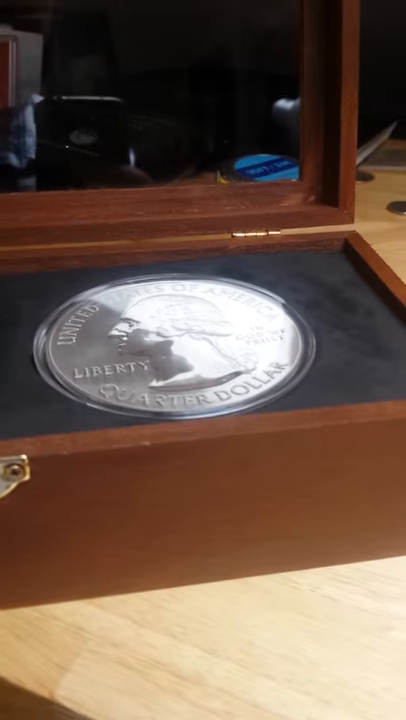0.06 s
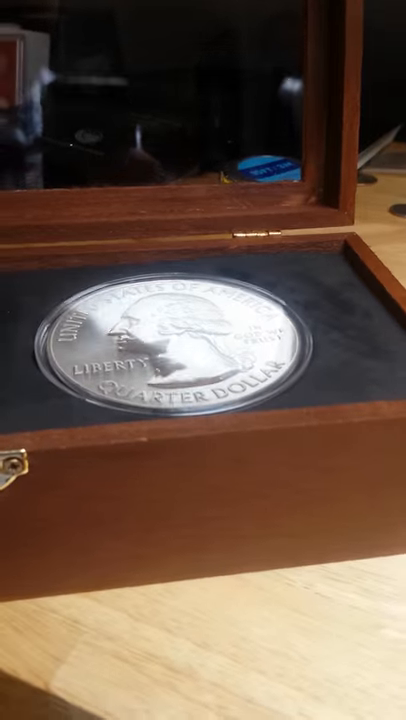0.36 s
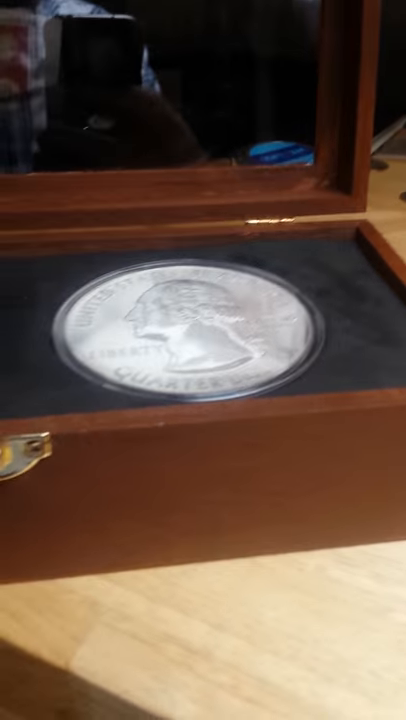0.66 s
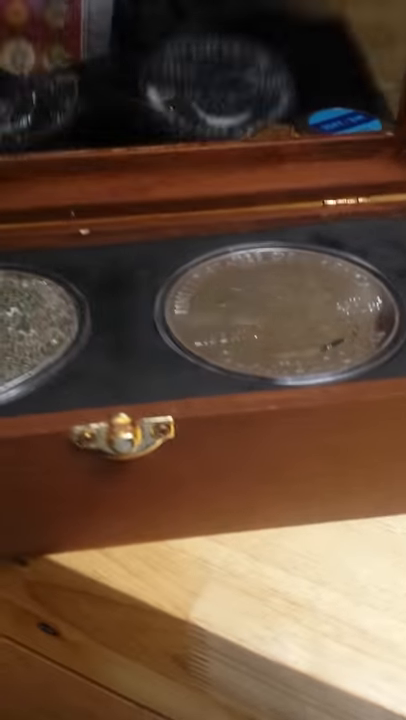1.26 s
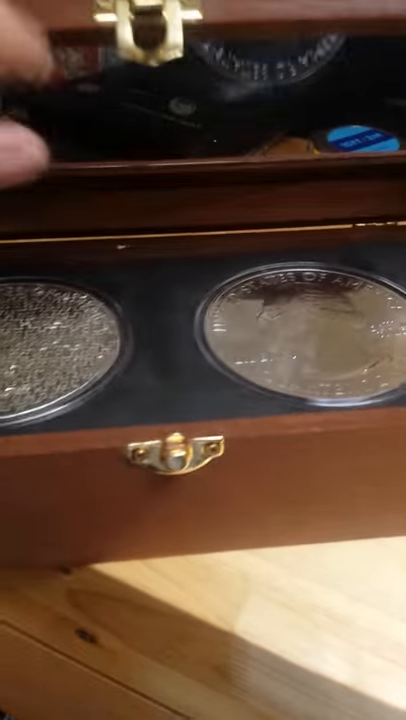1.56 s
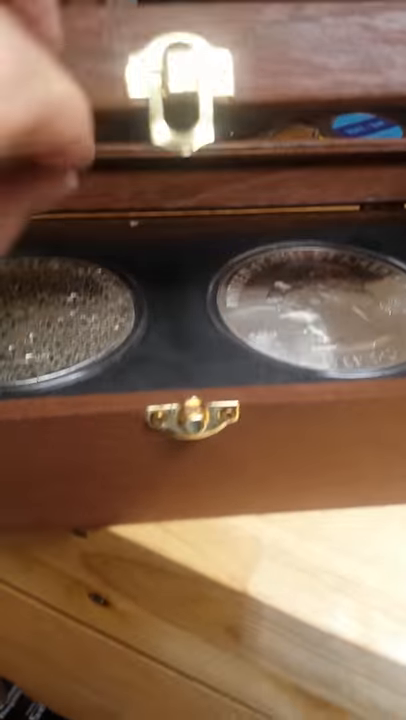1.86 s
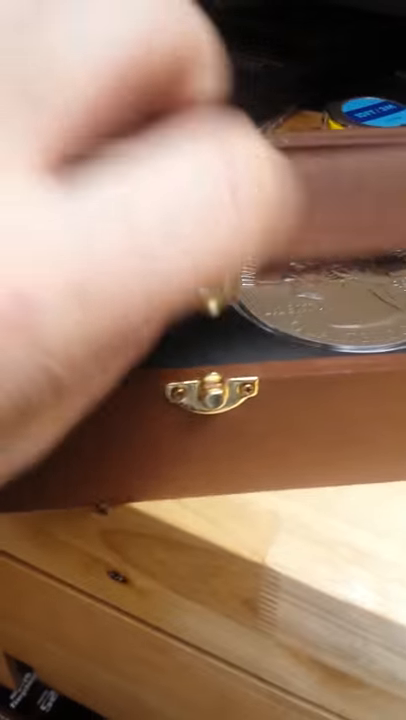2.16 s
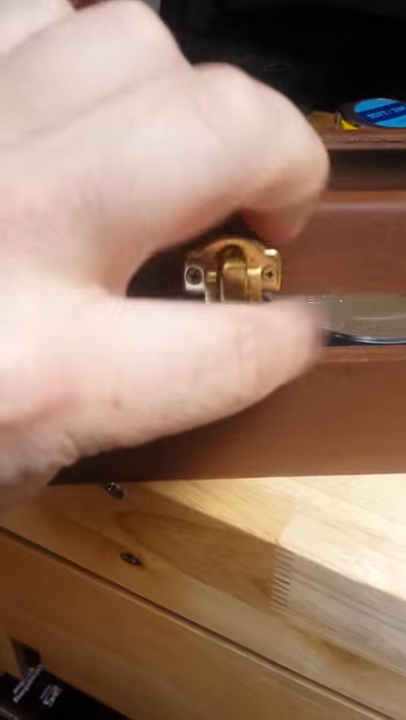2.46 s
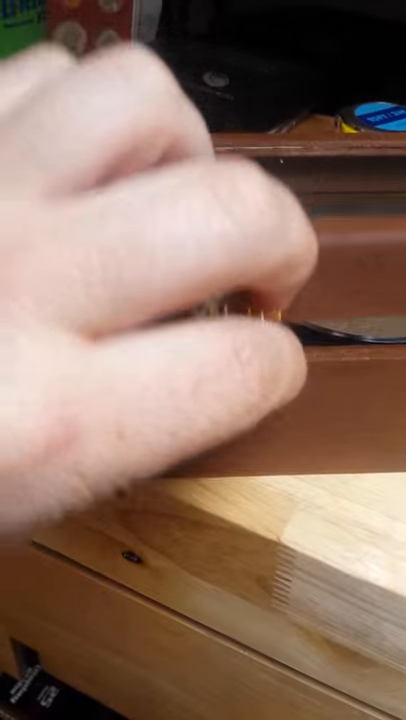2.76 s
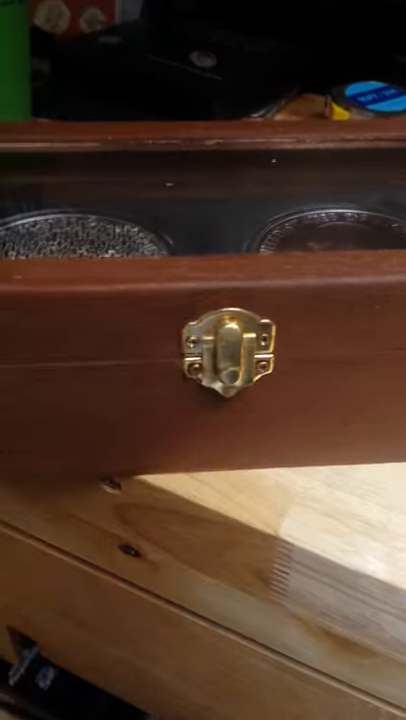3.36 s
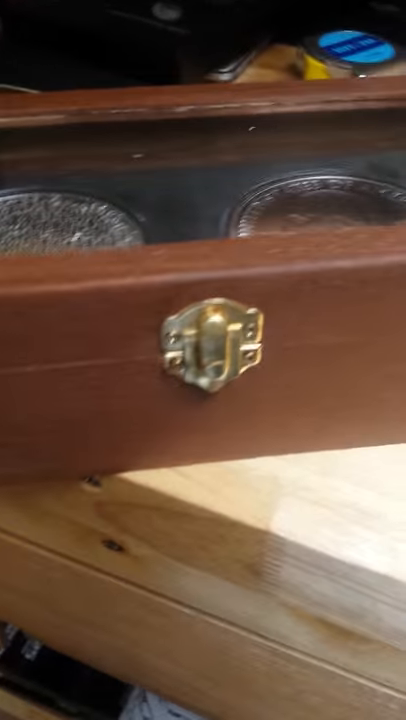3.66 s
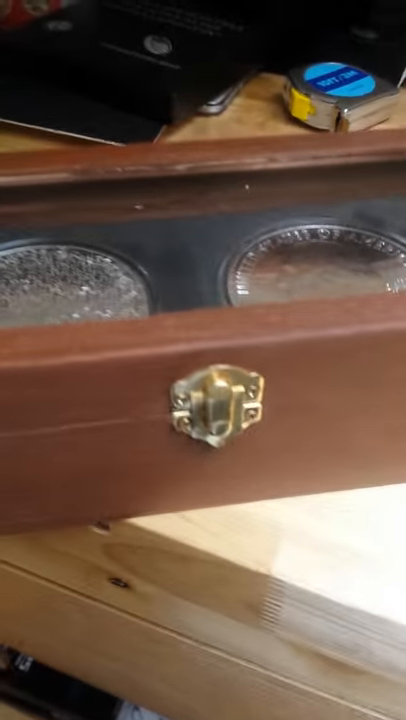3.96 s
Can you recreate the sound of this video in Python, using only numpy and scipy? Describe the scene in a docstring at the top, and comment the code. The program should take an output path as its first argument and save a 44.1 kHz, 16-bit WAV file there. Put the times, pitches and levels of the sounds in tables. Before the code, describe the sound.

A metal latch snaps shut sharply on a wooden box just after its lid thuds closed.

```python
"""A brass latch snaps shut on a wooden display box: metal cracks on metal, the brass rings, the case knocks.
Just before the snap, a hand lowers the lid and seats it with a soft thud; fingers rub the wood.
Behind them a machine hums and its panel rattles faintly in the small room.
The snap overloads the close microphones, and gain control turns the room down after it."""
import sys
import numpy as np
from scipy import signal
from scipy.fft import rfft, irfft
from scipy.io import wavfile
from scipy.ndimage import uniform_filter1d

SR = 44100
rng = np.random.default_rng(int(sys.argv[2]) if len(sys.argv) > 2 else 0)


def put_to_file(sound):
    """Save the sound as 16-bit audio at rate SR, in the file named by the first command-line argument."""
    columns = np.atleast_2d(sound).T  # one column per channel
    safe = np.clip(columns, -1, 1)
    whole_steps = np.round(safe * 32767)
    wavfile.write(sys.argv[1], SR, whole_steps.astype(np.int16))


N = 176400
T = np.arange(N) / SR
RING_T = T[:SR // 8]

# latch clicks, knock and hasp relative to their click: start_s, level_db, knock_db, hasp_db
LATCH_CLICKS = [(2.1687, -28.5, -18, -11), (2.245, -31.5, -2, -10), (2.5285, -35, -1, -13),
                (2.928, -33, 10.5, 6), (2.96, -33, -8, -1), (3.002, -31.5, -13.5, -6),
                (3.1052, -28.5, 5, -11), (3.109, -11.5, -5, -11), (3.112, -16.5, -2, -10),
                (3.1154, 0.3, 1, -12), (3.285, -42, 10, -10)]
# bite of metal on metal: freq_hz, level_db
CRACK_COLOUR = [(100, -20), (450, -19), (900, -3), (1600, -5), (2050, -9), (2650, 1), (3200, -8),
                (4200, -3.5), (5600, -2), (7000, 1.5), (8200, -6), (10300, -3), (12500, -9.5), (16000, -15)]
# bright ring of the brass: pitch_hz, level_db, t60_s, left_minus_right_db
BRASS_MODES = [(4157, -22.5, 0.038, 3), (4480, -34, .025, 2), (5320, -15, 0.024, -10),
               (6140, -21.5, 0.031, 6), (6660, -20, .018, 0), (7000, -14.5, .025, 0), (7440, -28, .03, 0),
               (8470, -24, 0.027, -6), (9300, -22, 0.021, -2), (9990, -21, 0.023, -4),
               (10530, -24, 0.02, -4)]
# knock of the wooden case: pitch_hz, level_db, t60_s
KNOCK_MODES = [(701, -29.5, .013), (818, -15, 0.027), (1066, -12.5, .015), (1232, -12.5, .015),
               (1514, -12, .019), (1740, -26, 0.011), (2570, -20, .011), (2620, -18.5, .011)]
# ping of the loose hasp: pitch_hz, level_db, t60_s
HASP_MODES = [(4840, -14, .035)]
CRACK_DB, CRACK_DECAY_S, CHATTER_DB, CHATTER_DECAY_S = -10, 0.0014, -18.5, 0.0074
LEFT_LAG_S, KNOCK_LEFT_LAG_RAD = 0.00003, 0.98  # the left microphone hears the latch later
def latch():
    """Each click is a short crack and chatter that rings the brass and knocks the wood."""
    out = np.zeros((2, N))
    burst = amp(CRACK_DB) * np.exp(-RING_T / CRACK_DECAY_S)
    burst += amp(CHATTER_DB) * np.exp(-RING_T / CHATTER_DECAY_S)
    knock = np.array([ring(KNOCK_MODES, np.pi / 2 - lag) for lag in (KNOCK_LEFT_LAG_RAD, 0)])
    hasp = ring(HASP_MODES)
    for start_s, db, knock_db, hasp_db in LATCH_CLICKS:
        crack = noise(CRACK_COLOUR, size=len(RING_T)) * burst
        brass = np.zeros_like(crack)
        for *mode, side_db in BRASS_MODES:
            pan = amp([[side_db / 2], [-side_db / 2]])
            brass += pan * np.array([ring([mode], phase) for phase in rng.uniform(0, 2 * np.pi, 2)])
        left, right = amp(db) * (crack + brass + amp(knock_db) * knock + amp(hasp_db) * hasp)
        add(out[0], start_s + LEFT_LAG_S, left)
        add(out[1], start_s, right)
    return latch_radiation(out)


def latch_spill(spill_db=16.5):
    """What the latch sends to the walls: over all directions its ring evens out into a plain click."""
    out = np.zeros((2, N))
    for start_s, db, *_ in LATCH_CLICKS:
        add(out, start_s, amp([db + spill_db]))
    return latch_radiation(out)


def latch_radiation(x, low_cut_hz=760):
    """A part as small as the latch radiates no bass."""
    return signal.sosfilt(signal.butter(3, low_cut_hz, "high", fs=SR, output="sos"), x)


# soft blows of wood on wood: start_s, level_db, contact_s
LID_THUDS = [(2.9358, 0.5, 0.001), (2.9516, -8, 0.0016)]
# hollow body of the shut box: pitch_hz, level_db, t60_s
BOX_MODES = [(128, -27, 0.045), (212, -19, 0.03), (325, -22.5, 0.022), (726, -17, .015),
             (890, -15.5, 0.017), (1230, -21, .016), (1560, -23, .012)]
def lid(low_cut_hz=50):
    """The lid lands with a cushioned blow and settles once more; the small box radiates little bass."""
    out = np.zeros((2, N))
    body = ring(BOX_MODES, np.pi / 2)
    for start_s, db, contact_s in LID_THUDS:
        push = np.sin(np.pi * np.minimum(T[:SR // 100] / contact_s, 1))  # longer contact, duller thud
        add(out, start_s, amp(db) * np.convolve(body, push / push.sum()))
    return signal.sosfilt(signal.butter(2, low_cut_hz, "high", fs=SR, output="sos"), out)


# fingers sliding on the lid: start_s, length_s, level_db, swell_db, squeak_db
FINGER_RUBS = [(1.44, 0.058, -52.5, 0, -9), (1.982, 0.064, -44.5, -1, -4.5), (2.04, 0.135, -49.5, -4, -7.5),
               (2.163, 0.095, -55, 8, -9.5), (2.326, 0.15, -47.5, -5.5, -15),
               (2.479, 0.067, -53.5, 8.5, -26), (2.638, 0.061, -56.5, 0, -20), (2.773, 0.22, -63, 3, -16),
               (2.95, 0.034, -45.5, 0, -10), (3.02, .09, -53, 1, -14), (3.697, 0.033, -55.5, -1.5, 0),
               (3.742, .04, -58, 5, -7), (3.933, 0.08, -58.5, 5, -11.5)]
# bright hiss of skin on wood: freq_hz, level_db
SKIN_COLOUR = [(300, 1), (1500, -1), (2900, 4), (3500, 3), (4200, 3), (4800, -1), (6500, -0.5),
               (8000, -1.5), (9800, -2), (11500, -9), (15500, -10)]
# thin squeak on top: freq_hz, level_db
SQUEAK_COLOUR = [(6000, -40.5), (7900, -10.5), (8500, -1), (9300, -9.5), (11000, -24), (12500, -19),
                 (15000, -33)]
# the panel's loudest rattles early on, then the lid scuffing the case: centre_s, half_width_s, level_db
DULL_RASPS = [(0.125, 0.018, -49.5), (0.75, .02, -51), (0.812, 0.0051, -50), (1.10, 0.011, -47.5),
              (2.53, .014, -43.5), (2.695, 0.037, -40.5), (2.695, 0.0046, -38.5), (2.709, 0.0025, -38),
              (2.761, .004, -41), (3.261, 0.002, -32)]
# tone of those rasps: freq_hz, level_db
RASP_COLOUR = [(100, -34), (500, -9), (860, 7), (1250, -1.5), (1650, -4), (2100, -14), (2500, -5.5),
               (3100, -20), (3700, -13), (4500, -22.5), (8000, -25), (14000, -51)]
# the hand withdrawing: centre_s, half_width_s, level_db
HAND_SWISH = (4.02, .17, -52.5)
# breathy tone of that swish: freq_hz, level_db
HAND_SWISH_COLOUR = [(1000, -29), (3000, -14), (4000, 3), (4800, 4), (6000, -8), (9000, -21), (14000, -25)]
def rubs_and_rasps(edge_s=0.022, grain_db=2.5, grain_s=0.0023):
    """Grainy noise: bright finger strokes with a thin squeak, dull rasps and the hand's last swish."""
    out = np.zeros((2, N))
    skin, squeak = noise(SKIN_COLOUR), noise(SQUEAK_COLOUR)
    for start_s, length_s, db, swell_db, squeak_db in FINGER_RUBS:
        fade_in = np.clip((T - start_s) / edge_s, 0, 1)
        fade_out = np.clip((start_s + length_s - T) / edge_s + 0.5, 0, 1)
        progress = np.clip((T - start_s) / length_s, 0, 1)
        out += fade_in * fade_out * amp(db + swell_db * progress) * (skin + amp(squeak_db) * squeak)
    for colour, strokes in ((RASP_COLOUR, DULL_RASPS), (HAND_SWISH_COLOUR, [HAND_SWISH])):
        swells = sum(amp(db) * np.exp(-((T - centre) / width) ** 2 / 2) for centre, width, db in strokes)
        out += noise(colour) * swells
    return out * unit(amp(grain_db * drift(grain_s)))


# tinny ring of the machine's panel: pitch_hz, level_db, t60_s
PANEL_MODES = [(675, -10.5, 0.055), (1160, 6, 0.035), (1240, 6, 0.055), (1250, -28, 0.0159)]
# its hardest taps: start_s, accent_db
PANEL_ACCENTS = [(0.11, 4.5), (0.6589, 12.5), (0.7257, 6), (0.7422, 7), (1.0931, 7)]
# fader ride on the rattle: time_s, level_db
RATTLE_RIDE = [(0, -6.5), (.11, 2.5), (.25, -2), (.5, 1), (.58, -19), (.74, 0), (.95, -9.5), (1.1, 1.5),
               (1.35, 0), (1.48, 2.5), (1.8, -2.5), (2, 1), (2.8, 0), (4, 0.5)]
def panel_rattle(level_db=-50, taps_per_s=60, jitter_s=0.0019, spread_db=3.2, right_lag_s=0.0001):
    """A panel rattles unevenly with the motor's turns."""
    taps = np.zeros(N)
    for turn, (slip, force) in enumerate(rng.standard_normal((260, 2))):
        add(taps, turn / taps_per_s + jitter_s * slip, amp([spread_db * min(force, 2)]))
    for start_s, accent_db in PANEL_ACCENTS:
        add(taps, start_s, amp([accent_db]))
    left = signal.oaconvolve(taps, ring(PANEL_MODES))[:N]
    right = np.interp(T - right_lag_s, T, left)
    ride_db = np.interp(T, *np.transpose(RATTLE_RIDE))
    return amp(level_db + ride_db) * unit(np.array([left, right]))


# low machine hum: pitch_hz, level_db
HUM_TONES = [(96.9, -58), (118.4, -57), (161.5, -58), (242.2, -58), (285.3, -53.5), (376.8, -56.5),
             (629.8, -55)]
# thin electrical whine: pitch_hz, level_db
WHINE_TONES = [(8890, -77.5), (9730, -75), (10620, -80)]
def machine_hum(hum_trim_db=-2):
    """The machine hums and whines, each tone wavering on its own."""
    return amp(hum_trim_db) * tones(HUM_TONES, wander_hz=3.5) + tones(WHINE_TONES, wander_hz=13)


# dark bed of room noise: freq_hz, level_db
AIR_COLOUR = [(25, -30), (42, -26.5), (58, -12), (90, 1), (135, -4), (185, -3), (220, -10.5), (300, -6),
              (400, -4.5), (490, -9.5), (630, -3), (760, -10), (1050, -9), (1300, -12), (1450, -17.5),
              (2200, -19.5), (2700, -23), (4200, -25), (6000, -26), (7500, -32), (9500, -34), (12000, -39),
              (15500, -45.5)]
# how alike it is in left and right: freq_hz, likeness_ratio
AIR_LIKENESS = [(30, 0.87), (130, 1), (290, 0.83), (640, 0.56), (1400, 0.32), (3100, 0.026), (15000, .02)]
def machine_air(level_db=-43, waver_db=0.9):
    """Rushing air with a slight flutter, centred in the bass and wide in the treble."""
    return noise(AIR_COLOUR, AIR_LIKENESS) * amp(level_db + waver_db * drift(seconds=0.027))


# tone of the reverb: freq_hz, level_db
ROOM_COLOUR = [(100, -11.5), (500, -3), (900, 2.5), (1500, 0), (2100, -0.5), (3000, -1), (4000, -0.5),
               (5300, 3), (7000, 1.5), (8700, -0.5), (10000, -7.5), (12000, -12), (16000, -19)]
# length of its tail: freq_hz, t60_s
ROOM_DECAY = [(100, 0.43), (1000, 0.33), (5000, 0.28), (9000, 0.24), (15000, 0.23)]
def room(x, wet_db=-11.5, predelay_s=0.012, rise_s=0.0096):
    """The walls answer after a short gap with a bright, quickly dying tail."""
    hz, t, spectrum = signal.stft(rng.standard_normal((2, SR // 2)), SR, nperseg=256)
    tail_db = read(ROOM_COLOUR, hz)[:, None] - 60 * t / read(ROOM_DECAY, hz)[:, None]
    tail = signal.istft(spectrum * amp(tail_db), SR, nperseg=256)[1]
    tail *= np.clip((T[:tail.shape[1]] - predelay_s) / rise_s, 0, 1)
    return amp(wet_db) * signal.oaconvolve(x, tail / np.linalg.norm(tail[0]), axes=1)[:, :N]


# how alike the two microphones hear close sounds: freq_hz, likeness_ratio
CLOSE_LIKENESS = [(100, 0.66), (1000, 0.94), (3000, 0.17), (6000, 0.17), (15000, 0.26)]
def noise(colour, likeness=CLOSE_LIKENESS, size=N):
    """Coloured stereo noise at rms 1; likeness narrows its image band by band."""
    hz = np.fft.rfftfreq(size, 1 / SR)
    left, independent = rfft(rng.standard_normal((2, size)))
    shared = np.clip(read(likeness, hz), 0, 1)
    right = shared * left + np.sqrt(1 - shared ** 2) * independent
    return unit(irfft(np.array([left, right]) * amp(read(colour, hz)), size))


def ring(modes, phase=0):
    """Dying modes of a struck object."""
    return sum(amp(db - 60 * RING_T / t60) * np.sin(2 * np.pi * hz * RING_T + phase)
               for hz, db, t60 in modes)


def tones(lines, wander_hz):
    """Steady tones whose pitch wanders a little."""
    out = np.zeros(N)
    for hz, db in lines:
        pitch_hz = hz + wander_hz * drift(seconds=0.03)
        out += amp(db) * np.sqrt(2) * np.sin(2 * np.pi * np.cumsum(pitch_hz) / SR)
    return out


def drift(seconds):
    """Smooth random motion that changes over the given time."""
    hz = np.fft.rfftfreq(N, 1 / SR)
    return unit(irfft(rfft(rng.standard_normal(N)) * np.exp(-(2 * hz * seconds) ** 2), N))


def amp(db):
    """Decibels to gain."""
    return 10 ** (np.asarray(db) / 20)


def unit(x):
    """Scales to rms 1."""
    return x / np.sqrt(np.mean(x ** 2) + 1e-20)


def read(points, hz):
    """Reads a curve on a log-frequency axis."""
    freq_hz, value = np.transpose(points)
    return np.interp(np.log(hz + 1), np.log(freq_hz), value)


def add(mix, start_s, sound):
    """Drops a sound into the mix."""
    part = mix[..., max(round(start_s * SR), 0):][..., :sound.shape[-1]]
    part += sound[..., :part.shape[-1]]


def scene():
    """The box and the hand close by, in the humming room."""
    soft_sounds = lid() + rubs_and_rasps()
    foreground = latch() + soft_sounds + room(soft_sounds + latch_spill())
    return foreground + machine_air() + machine_hum() + panel_rattle()


def gain_control(dry, threshold_db=-23.5, slope=0.8, attack_s=0.22, creep_db_per_s=0.5):
    """A gain that ducks after a peak and stays down, sinking slowly all the while."""
    power = uniform_filter1d((dry ** 2).mean(0), size=220)
    over_db = np.maximum(10 * np.log10(abs(power) + 1e-12) - threshold_db, 0)
    creep_db = T * creep_db_per_s
    held_db = np.maximum.accumulate(over_db - creep_db) + creep_db
    pole = np.exp(-1 / (attack_s * SR))
    return amp(-slope * signal.lfilter([1 - pole], [1, -pole], held_db))


# stereo tilt of the microphone ports: freq_hz, left_minus_right_db
PORT_TILT = [(100, .5), (300, 2.5), (500, 5.5), (800, 1), (1250, 3.5), (2000, 2), (2800, 1.5), (4000, 5),
             (5900, 6.5), (7100, 1.5), (8400, -12), (10000, -15.5), (12000, -11), (15000, -5)]
HISS_DB, BAND_LIMIT_HZ = -63, 15600
def record(dry):
    """Two unlike microphone ports with their own hiss, then gain control, overload and a band limit."""
    tilt_db = read(PORT_TILT, np.fft.rfftfreq(N, 1 / SR))
    mics = irfft(rfft(dry) * amp([tilt_db / 2, -tilt_db / 2]), N)
    mics += amp(HISS_DB) * rng.standard_normal((2, N))
    clipped = np.clip(mics * gain_control(dry), -1, 1)
    low_pass = signal.firwin(511, BAND_LIMIT_HZ, window=("kaiser", 9), fs=SR)
    return signal.oaconvolve(clipped, low_pass[None], "same")


dry = scene()
out = record(dry)
put_to_file(out)
```